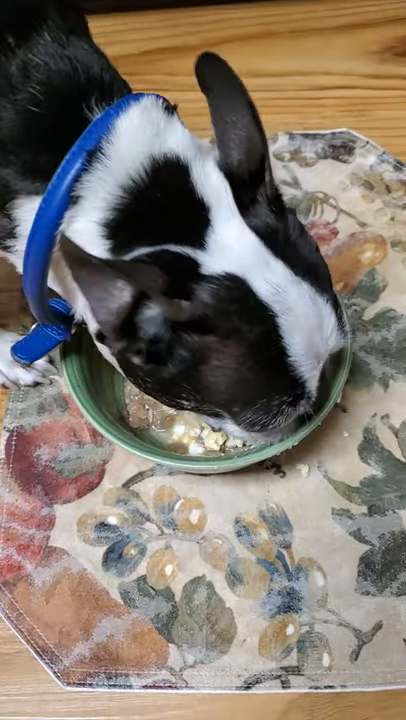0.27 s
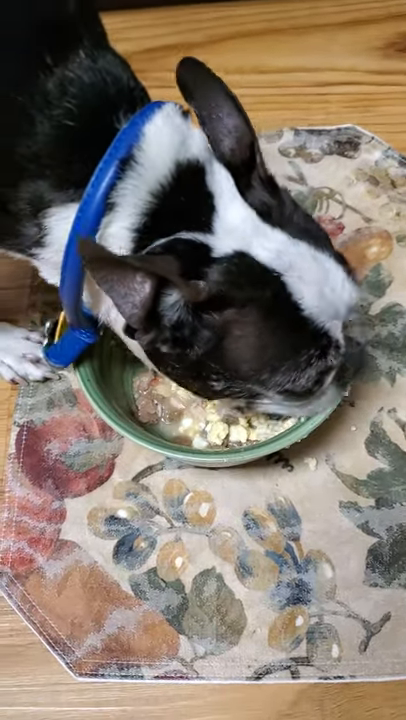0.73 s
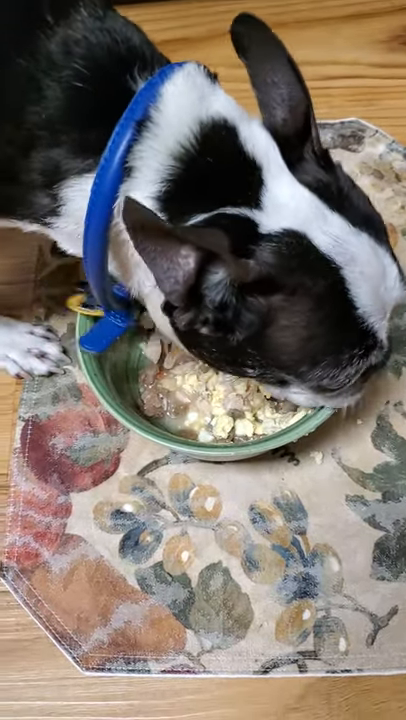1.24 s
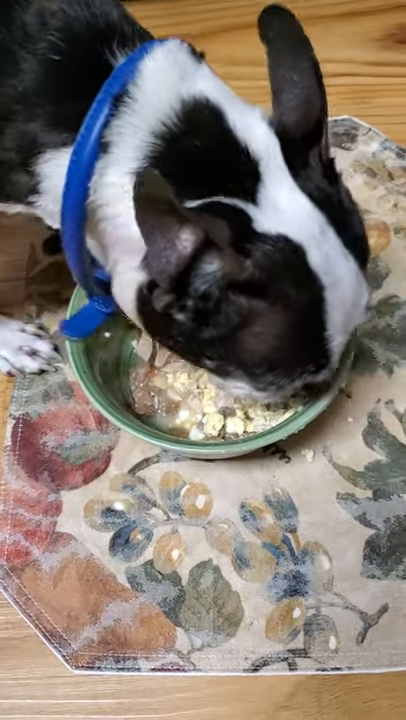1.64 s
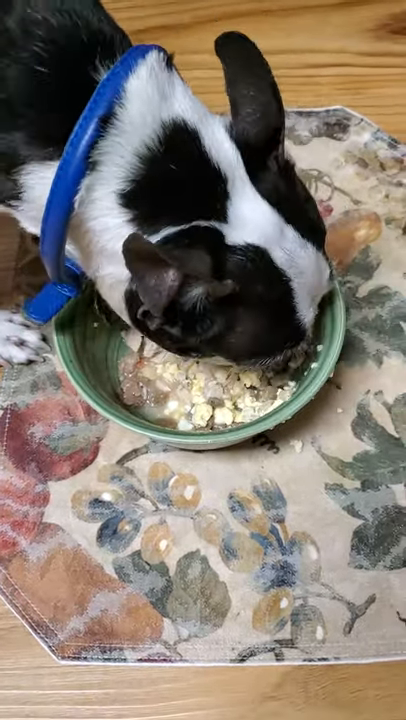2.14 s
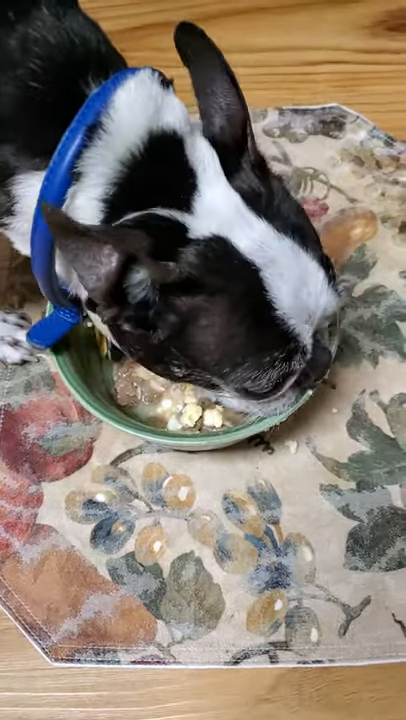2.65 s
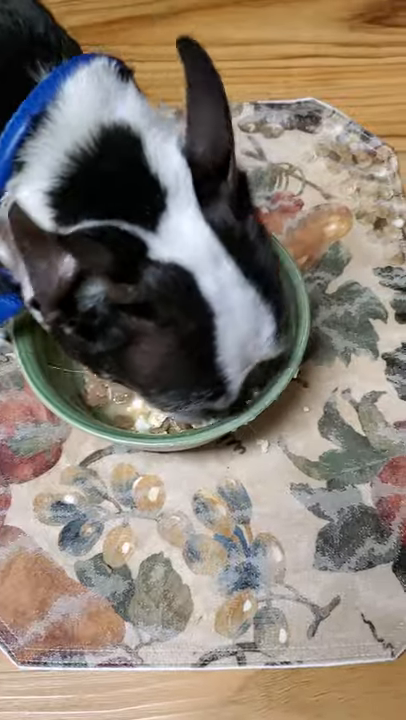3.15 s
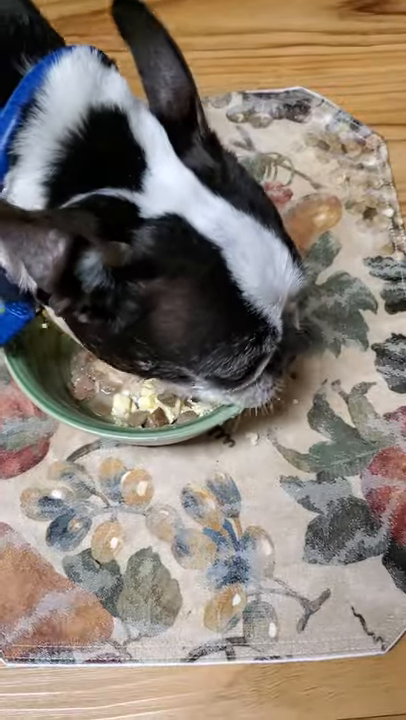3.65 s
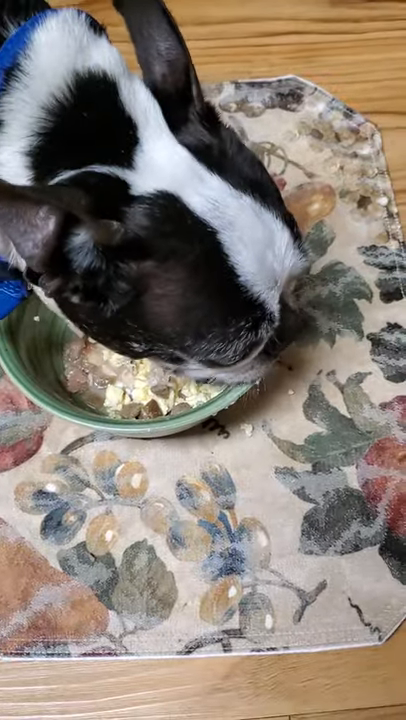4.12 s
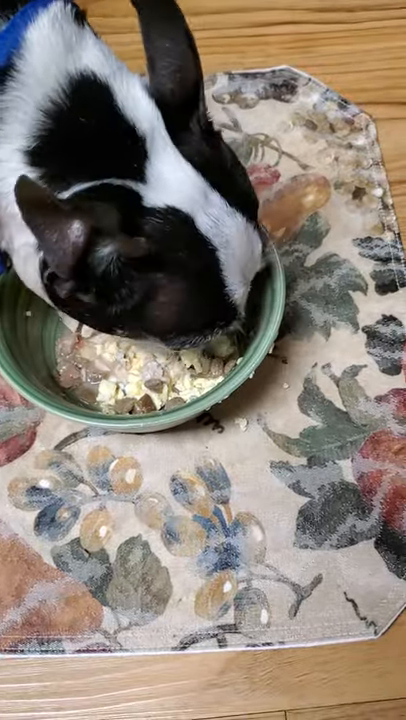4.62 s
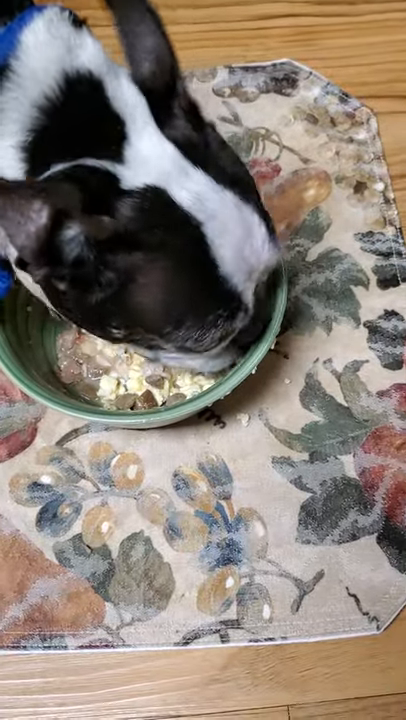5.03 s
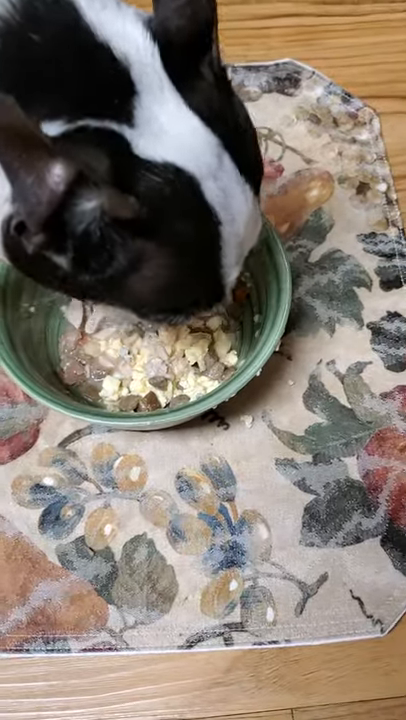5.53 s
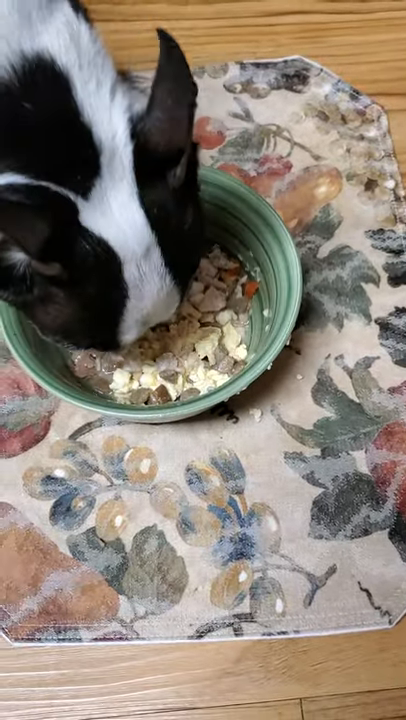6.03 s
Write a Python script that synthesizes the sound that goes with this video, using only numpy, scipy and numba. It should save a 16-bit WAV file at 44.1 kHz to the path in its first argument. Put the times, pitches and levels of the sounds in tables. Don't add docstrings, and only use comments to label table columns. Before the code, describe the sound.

A flat-nosed dog gobbles soft food close up, smacking wetly and snorting, while its metal tag clinks against a ringing ceramic bowl.

```python
import sys
import numpy as np
from scipy import signal
from scipy.fft import rfft, irfft, next_fast_len
from scipy.io import wavfile
from scipy.ndimage import uniform_filter1d
from numba import njit

SR = 44100
rng = np.random.default_rng(int(sys.argv[2]) if len(sys.argv) > 2 else 0)


def decibels_to_gain(level_db):
    exponent = np.asarray(level_db, float) / 20
    return 10 ** exponent


def pcm_store(signal):
    levels = np.round(np.clip(np.atleast_2d(signal), -1, 1) * 32767)
    wavfile.write(sys.argv[1], SR, levels.astype(np.int16).T)


N = 276940

# (time [s], tick peak [dB], ring [dB], tilt toward high modes [dB per group],
# spot on the rim: raises every other group, lowers the rest [dB])
BOWL_TAPS = [(0.399, -58, -71, -3.5, 6.5), (0.4917, -22.5, -57, 0, 3.5), (0.7165, -33, -60.5, 0, 1.5),
             (0.858, -43, -73.5, -3.5, -1), (1.766, -16, -31.5, -0.5, 5), (1.9753, -30, -44.5, -2.5, 4),
             (2.0655, -17, -47.5, -4, 4), (2.1447, -50.5, -66, -4, 11), (2.19, -21, -53.5, -2.5, 0.5),
             (2.2987, -22.5, -60.5, 1, 7.5), (2.375, -24.5, -62, -1, 3), (2.863, -51.5, -70, 3.5, 5),
             (3.2135, -18, -41.5, 3, 0), (3.2999, -20.5, -58, 2.5, 11.5), (4.5181, -18, -31.5, 0.9, 2),
             (4.8464, -30, -52.5, -1, 1.5), (4.9317, -28, -66.5, -6, 4.5), (5.1502, -35, -61, -1.3, 2),
             (5.252, -26, -57.5, 0.5, 1), (5.3229, -45, -56.5, 3, 0.5), (5.8782, -14, -37.5, -0.1, 4),
             (5.9828, -19, -56, 3, -4.5), (6.2354, -27, -59.5, 2.5, 3)]
# (frequency [Hz], ..)
BOWL_HZ = [
    [2390, 2379, 991],
    [4253, 4241, 4279],
    [6541, 6529],
    [9168, 9146, 12050, 12010, 13880, 15160],
]
# (level [dB], decay t60 [s], left over right [dB])
BOWL_MODES = [
    [(3, 0.33, -14), (-10, 0.28, -2), (-14.5, 0.33, -10.5)],
    [(-0.5, 0.072, -7), (-13.5, .33, -13.5), (-13, 0.24, -7)],
    [(3, 0.34, -6.5), (-18, 0.12, 10)],
    [(-6, 0.2, 8), (-7.5, 0.21, 8.5), (-5.5, 0.37, 4.5), (-7.5, 0.15, 6.5), (-12.5, .22, 9),
     (-1.5, 0.19, 9)],
]
# (time [s], change [dB])
RIM_TOUCHES = [(0.43, -5), (0.56, -1), (1.94, -15), (2.19, -9), (2.27, -7), (2.33, -3), (3.3, -8.5),
               (5.2, 3), (5.36, -7), (5.9, -0.5), (6.03, -13)]
# (time [s], tick peak [dB], ring [dB], top group over the ring [dB])
TAG_FACE_TAPS = [(1.2323, -17, -65.5, 9), (1.3812, -14.5, -71, 22), (1.9776, -4.5, -37, 9),
                 (2.0644, -26, -45.5, 14), (2.372, -41, -56, 14.5), (2.612, -34, -73, 14),
                 (3.2136, -8, -41.5, -22), (4.5192, -37, -39.5, -24), (4.8474, -31, -48.5, 7.5),
                 (5.1502, -18.5, -55, 13), (5.8785, -22, -53, -1), (6.1622, -27, -59, -7)]
# (time [s], tick peak [dB], ring [dB], top group over the ring [dB])
TAG_EDGE_TAPS = [(0.0343, -30, -68, 1), (0.0744, -14, -56, 7.5), (0.4691, -18.5, -54, -3),
                 (0.656, -28, -59, 0), (0.7063, -32, -58, 10), (0.7198, -22, -57, 8),
                 (0.858, -34, -68.5, 10), (0.4615, -30, -70, 6), (1.498, -36, -68, 5),
                 (1.255, -30, -64.5, 2), (2.1914, -30, -54.5, 15.5), (2.4234, -15.5, -61, 11),
                 (4.3136, -30, -77, -9), (5.1327, -44, -74, 2), (1.1483, -37, -68, 8),
                 (1.289, -26, -33, -1.5), (1.452, -24, -56, 0), (1.6466, -35, -64.5, 5),
                 (1.7649, -14.5, -42.5, -5.5), (2.1447, -25, -54.5, 22), (2.8255, -19, -55, 9.5),
                 (3.6533, -29, -61, 6.5), (4.964, -38, -57.5, 9), (5.251, -40, -50.5, 12),
                 (5.3228, -17, -55, 18)]
# (frequency [Hz], ..)
TAG_HZ = [
    [8376, 8350],
    [10220, 10300, 10095],
    [11670, 11610, 14970],
]
# (level [dB], decay t60 [s], left over right [dB])
TAG_MODES = [
    [(-4, 0.17, 12), (-11, 0.19, 5.3)],
    [(3.5, 0.15, 7.8), (1.5, 0.081, 6.6), (-9.5, 0.085, 5.5)],
    [(1.5, 0.083, 5), (-11.5, 0.26, 5), (-11.5, 0.15, 4)],
]
# (time [s], peak [dB], cavity [Hz],
# bright part [dB], dull part [dB])
SMACKS = [(0.067, -43, 2680, -20, -21), (0.0808, -23, 2580, -66, -1), (0.4314, -41.5, 2650, -11.5, -14),
          (0.89, -58.5, 2600, 2, -13), (1.0549, -42, 2680, -14, 0.5), (1.1837, -49, 2700, -18, -10),
          (1.198, -28, 2635, -21, -7), (1.379, -33.5, 2710, -18, 3), (1.5173, -35, 2580, -10, -36),
          (1.5247, -26, 2320, -9.5, -36), (1.534, -24, 2600, -34, -53), (2.2876, -34, 2720, -58, -18),
          (2.3247, -27, 2560, -50, -27), (2.3376, -34, 2530, -23, -22), (2.6414, -47.5, 2380, -20, -8),
          (2.653, -38.5, 2540, -18, -6), (2.751, -48, 2620, -19, -5), (2.9617, -45, 2640, -28, -2),
          (3.0807, -48, 2690, -34, -21), (3.652, -40, 2670, -31, -25), (3.931, -51, 2700, -19, -10),
          (3.946, -45, 2680, -34, 5), (3.961, -50, 2844, -21, -8), (4.1098, -30, 2790, -16, -19),
          (4.1234, -49, 2760, -30, -10), (4.244, -41.5, 2680, -14.5, 1), (4.2728, -40, 2680, -25, -2),
          (4.4412, -45, 2680, -8, 1), (4.78, -46, 3000, -12, -15), (5.053, -48, 2700, -12, -15),
          (4.887, -36, 2540, -18, -23), (5.67, -37.5, 3300, -38, -4), (0.553, -45, 2370, -30, -20.5),
          (3.812, -45, 2790, -23, 3),
          (0.112, -52.5, 1920, -32, 22), (0.206, -36, 1870, -26, 4.5),
                 (0.6064, -46.5, 1920, -19, -8), (1.019, -47, 1890, -41, -21), (1.363, -52, 1910, -25, -10),
                 (1.944, -52, 1960, -4, 14), (2.194, -50, 1510, -30, 10), (2.2061, -38, 1710, -37.5, 14),
                 (2.806, -45.5, 1860, -13, -10), (2.818, -41, 1940, -22, -8), (3.139, -49, 1910, -9.5, -3),
                 (3.2084, -47, 1950, -25, 12.5), (3.8058, -48, 1815, -6, 9), (4.0273, -43, 1966, -16, -15),
                 (4.0676, -38.5, 2210, -18, -10), (4.1681, -30.5, 1853, -39, 3.5),
                 (4.597, -39, 1600, -28, 3), (5.3652, -45, 1830, -20, -5), (5.5393, -38.5, 2020, -6.5, 6.5),
                 (6.0464, -44, 1900, -20, -7), (6.1315, -41, 1930, -18, 0), (6.2744, -43, 1885, -42, -24),
                 (0.36, -53, 1900, -35, -21)]
# (multiple of the cavity pitch, level [dB])
MOUTH_MODES = [(.58, -16.5), (1, 1), (1.45, -15.5), (1.75, -17.5), (2.45, -22.5)]
# (time [s], wet crackle [dB], spray over the crackle [dB])
CHEWS = [(0.11, -41.5, -22), (0.48, -56.5, -30), (0.66, -64, -24), (1.06, -53, -18.5), (1.17, -55.5, -14.5),
         (1.31, -58, -6.5), (1.41, -54, -30), (1.56, -70.5, 12.5), (1.981, -52, -18), (2.13, -63, -6),
         (2.29, -47, -34), (2.44, -56, -18), (2.86, -61, -13), (3.2, -60, -17), (3.36, -60.5, -19),
         (3.759, -59, -9), (3.89, -53.5, -30), (4.01, -62, -9), (4.134, -46.5, -15.5), (4.589, -44, -22),
         (4.721, -72, -7.5), (5.28, -50.5, -39), (5.39, -50, -26), (5.47, -52.5, -3), (5.55, -53.5, -8),
         (5.72, -65.5, 1), (5.82, -54.5, -3.5), (5.93, -58.5, -1.5), (6.02, -71, 7), (6.136, -46.5, -26)]
# (start [s], length [s], nostril flutter [Hz], flutter [dB], rasp [dB])
BURST_SNORTS = [
    (-0.018, 0.18, 158.8, -39.5, -39.5),
    (2.185, .115, 116.4, -37, -31),
    (2.389, .11, 148.5, -33.5, -37.5),
    (2.652, 0.072, 123.7, -37, -34.5),
    (2.802, .07, 122.7, -34, -35.5),
    (3.498, 0.093, 110.3, -40.5, -41),
    (4.581, .065, 123.4, -58, -39.5),
    (5.659, 0.23, 180.4, -32, -30.5),
]
# (start [s], length [s], nostril flutter [Hz], flutter [dB], rasp [dB])
SWELL_SNORTS = [(1.976, .12, 193.3, -45, -32.5), (3.413, .14, 161.5, -32, -33),
                (4.024, 0.095, 171.3, -33, -33), (4.161, 0.061, 151.6, -61, -39.5),
                (5.223, 0.14, 160, -34.5, -34.5), (5.346, 0.13, 166, -38.5, -26),
                (0.434, 0.089, 149.2, -43, -55), (3.747, .08, 119.7, -41, -58),
                (5.901, 0.096, 121.9, -37.5, -36), (5.967, 0.12, 121, -38, -31),
                (6.062, .16, 134.8, -37, -31.5)]
# (time [s], frequency [Hz])
NOSE = [(0, 656), (2.0, 710), (2.85, 760), (3.45, 474), (4.2, 519.3), (5.28, 684), (5.42, 533.4),
        (5.75, 649), (5.95, 890), (6.07, 593), (6.28, 750)]
# (time [s], peak [dB])
PALATE = [(2.198, -23), (5.234, -37), (5.671, -24), (5.71, -22), (5.734, -13), (5.75, -16), (5.984, -19),
          (6.014, -24), (6.046, -17), (6.085, -17.5), (6.121, -20), (6.137, -19.5)]
# (time [s], peak [dB])
PUFFS = [(5.6935, -46), (5.708, -48), (5.7279, -55), (5.7448, -38.5), (5.758, -49), (5.79, -44),
         (5.82, -45.5), (5.85, -48), (5.94, -35), (6.012, -37), (6.046, -44), (6.0676, -37), (6.084, -49),
         (6.115, -42), (6.134, -40), (4.045, -47), (4.07, -46.5), (5.46, -44), (5.479, -37.5)]
# (time [s], level [dB])
BREATHS = [(0.11, -73.5), (0.84, -80), (1.31, -76), (1.56, -75), (1.85, -73), (2.0, -70), (2.22, -77),
           (3.36, -72), (3.759, -77.5), (4.13, -79), (4.59, -76), (5.22, -84), (5.47, -63.5), (5.75, -76),
           (5.93, -73), (6.136, -67.5)]
# (frequency [Hz], level [dB per Hz])
HISS = [(4000, -35.5), (6800, -11), (15300, -6), (16300, -8), (16500, -52)]
# (frequency [Hz], likeness [0..1])
LIKENESS = [(60, 0.28), (250, 0.98), (700, 0.067), (2000, 0.44), (10000, 0.16)]
# (frequency [Hz], level [dB rms])
HUM = [(59.2, -45), (80.7, -42.5), (118.4, -57)]
# (frequency [Hz], level [dB per Hz])
ROOM_TONE = [(29, -31), (50, 7), (87, 2), (126, 10), (989, -14), (1140, -52.5), (2370, -19.5),
             (3850, -72.5), (15000, -77.5), (16500, -59)]
# (time [s], level [dB])
BACKGROUND = [
    (0.0, -47),
    (2.87, -51.5),
    (4.76, -48),
    (4.95, -49.5),
    (6.28, -46.5),
]

RIGHT_LAG = 8
RATTLE_LOW_HZ = 7800
FACE_LOW_DB, EDGE_LOW_DB = 4, -11
CHEW_RISE_DB_PER_S, CHEW_FALL_DB_PER_S = 181.5, 154
BURST_ATTACK_S, BURST_FROM_DB, BURST_FADE_DB = .016, -43, -21.5
SWELL_ATTACK_SHARE, SWELL_FROM_DB, SWELL_FADE_DB = .45, -17.5, -16
FLUTTER_SAG_PER_S = .4
MOUTH_PAN_DB, MOUTH_ROOM_DB = -9.5, -24
ROOM_T60_S = 0.42


def unit(x):
    return x / np.sqrt(np.mean(x ** 2) + 1e-20)


def in_time(rows):
    s, *columns = np.transpose(rows)
    return [np.interp(np.arange(N) / SR, s, c) for c in columns]


def band(x, low_hz, high_hz, order=2):
    edges = [low_hz, min(high_hz, .45 * SR)]
    return signal.sosfilt(signal.butter(order, edges, "band", fs=SR, output="sos"), x)


def drift(rate):
    r = np.exp(-80 * np.pi * rate / SR)
    slow = signal.lfilter([1], [1, -2 * r, r * r], rng.standard_normal(N // 40 + 2002))[2000:]
    return np.interp(np.arange(N) / 40, np.arange(len(slow)), unit(slow))


def ring(clicks, hz, t60):
    r, w = decibels_to_gain(-60 / (t60 * SR)), 2 * np.pi * hz / SR
    return signal.lfilter([0, np.sin(w)], [1, -2 * r * np.cos(w), r * r], clicks + 1e-18)


def clicks_at(times, db):
    x = np.zeros(N)
    x[(np.asarray(times) * SR).astype(int)] = decibels_to_gain(db)
    return x


def burst(clicks, t60):
    return signal.lfilter([1], [1, -decibels_to_gain(-60 / (t60 * SR))], clicks) * rng.standard_normal(N)


def place(x, pan_db):
    return np.array([x * decibels_to_gain(pan_db / 2), np.roll(x, RIGHT_LAG) * decibels_to_gain(-pan_db / 2)])


def swells(times, db, rise_db_per_s, fall_db_per_s, rest_db):
    t = np.arange(0, N + 64, 64) / SR
    late = t - np.array(times)[:, None]
    each = np.array(db)[:, None] + np.minimum(rise_db_per_s * late, -fall_db_per_s * late)
    return np.interp(np.arange(N) / SR, t, np.maximum(each.max(axis=0), rest_db))


def on_log(points, hz):
    point_hz, value = np.transpose(points)
    return np.interp(np.log(hz), np.log(point_hz), value)


def coloured(spectrum, patchy_db):
    out = 0
    edges = 45 * 2 ** np.arange(0, 8.6, .5)
    white = rng.standard_normal((2, 2, N))
    for k, (low, high) in enumerate(zip(edges, edges[1:])):
        hz = np.sqrt(low * high)
        if hz > spectrum[0][0]:
            mid, side = band(white[k % 2], low, high)
            alike = np.clip(on_log(LIKENESS, hz), 0, 1)
            gain = decibels_to_gain(on_log(spectrum, hz) + patchy_db * drift(33.4))
            out = out + gain * (np.sqrt(1 + alike) * mid + np.sqrt(1 - alike) * side * [[1], [-1]])
    return unit(out)


@njit
def sliding_resonance(x, w, r):
    y = np.zeros(len(x))
    for i in range(2, len(x)):
        y[i] = (1 - r * r) / 2 * (x[i] - x[i - 2]) + 2 * r * np.cos(w[i]) * y[i - 1] - r * r * y[i - 2]
    return y


def struck(taps, modes_hz, modes, ring_db, tick_db, rattle_db, rattle_s, low_hz, left, wash_db):
    taps = np.array(taps)
    s = taps[:, 0]
    hits = clicks_at(s, taps[:, 1])
    out = place(band(burst(hits, 0.022), low_hz, 14000), 0.86) * decibels_to_gain(tick_db)
    rattle = np.array([burst(hits, rattle_s), burst(hits, rattle_s)])
    out += band(rattle, RATTLE_LOW_HZ, 15000) * decibels_to_gain(rattle_db)
    low_rattle = band(burst(hits, rattle_s), 0.24 * RATTLE_LOW_HZ, 0.42 * RATTLE_LOW_HZ)
    out += place(low_rattle, -9.5) * decibels_to_gain(rattle_db - 3.5)
    wash_hits = clicks_at(s, taps[:, -1] + wash_db) / left
    wash = np.array([burst(wash_hits, .17), burst(wash_hits, 0.15)])
    out += left * band(wash, 9900, 15400) * decibels_to_gain(np.array([[2.5], [-2.5]]))
    for k, (pitches, group) in enumerate(zip(modes_hz, modes)):
        for f, (db, t60, pan_db) in zip(pitches, group):
            push = clicks_at(s, taps[:, 2 + k] + db + ring_db) / left
            swell = ring(push, f, 0.003)
            warble = left * decibels_to_gain(min(f / 4000, 2.6) * drift(40 + f / 40))
            out += place(warble * ring(swell, f, t60) / 16, pan_db)
    return out


def bowl():
    steps = np.arange(len(BOWL_MODES)) - (len(BOWL_MODES) - 1) / 2
    around = np.array([-1, 1, -1, 1])
    taps = [(s, tick, *(db + tilt * steps + spot * around)) for s, tick, db, tilt, spot in BOWL_TAPS]
    touch_db = np.cumsum(sum(db * clicks_at([s], 0) for s, db in RIM_TOUCHES))
    left = decibels_to_gain(uniform_filter1d(touch_db, size=300))
    return struck(taps, BOWL_HZ, BOWL_MODES, ring_db=10.0, tick_db=-15.0, rattle_db=-14.0, rattle_s=0.045,
                  low_hz=925, left=left, wash_db=5.5)


def tag():
    taps = [(s, tick, db + FACE_LOW_DB, db, db + top) for s, tick, db, top in TAG_FACE_TAPS]
    taps += [(s, tick, db + EDGE_LOW_DB, db, db + top) for s, tick, db, top in TAG_EDGE_TAPS]
    return struck(taps, TAG_HZ, TAG_MODES, ring_db=9.5, tick_db=-30.0, rattle_db=-18.5, rattle_s=0.05,
                  low_hz=9100, left=1, wash_db=0.5)


def smacks():
    s, db, hz, bright_db, dull_db = np.transpose(SMACKS)
    tearing = decibels_to_gain(7 * drift(250))
    pops, click = np.zeros(N + 2048), np.eye(1, 2048)[0]
    for start, d, f in zip((s * SR).astype(int), db, hz):
        mouth = sum(decibels_to_gain(g) * ring(ring(click, k * f, 0.0029), k * f, 0.02) for k, g in MOUTH_MODES)
        pops[start:start + len(click)] += decibels_to_gain(d + 7.5) * mouth / 11
    pops = pops[:N]
    snap = band(burst(clicks_at(s, db - 5.0), 0.0036), 1200, 2700)
    broad = band(tearing * burst(clicks_at(s, db - 0.8), 0.17), 1810, 3150, order=3)
    spray = band(np.sqrt(tearing) * burst(clicks_at(s, db + bright_db + 5.0), 0.12), 3400, 8900)
    thud = burst(clicks_at(s, db + dull_db + 3), 0.12)
    dull = snap + band(thud, 450, 1170, order=3) + decibels_to_gain(-15.5) * band(tearing * thud, 1260, 3100)
    return pops + broad + spray, dull


def crackle(db, low_hz, high_hz, cycles, per_s):
    sizes = decibels_to_gain(4.3 * np.minimum(rng.exponential(1, N), 5)) * rng.choice([-1, 1], N)
    born = rng.random(N) < per_s * decibels_to_gain(4.0 * drift(25)) / SR
    pitches = np.geomspace(low_hz, high_hz, 10)
    dealt = rng.integers(0, 10, N)
    pops = sum(ring(sizes * born * (dealt == k), hz, cycles / hz) for k, hz in enumerate(pitches))
    return decibels_to_gain(db) * unit(pops)


def chewing():
    s, db, spray_over_db = np.transpose(CHEWS)
    crackle_db = swells(s, db, CHEW_RISE_DB_PER_S, CHEW_FALL_DB_PER_S, rest_db=-71)
    spray_db = swells(s, db + spray_over_db, CHEW_RISE_DB_PER_S, CHEW_FALL_DB_PER_S, rest_db=-84)
    squeeze = crackle(crackle_db + 2.5, 1628, 2700, cycles=18.5, per_s=1000)
    return squeeze + crackle(spray_db + 8.0, 3130, 5160, cycles=30, per_s=5400)


def airflow():
    t = np.arange(0, N + 32, 32) / SR
    shapes = [(BURST_ATTACK_S, BURST_FROM_DB, BURST_FADE_DB, *row) for row in BURST_SNORTS]
    shapes += [(SWELL_ATTACK_SHARE * row[1], SWELL_FROM_DB, SWELL_FADE_DB, *row) for row in SWELL_SNORTS]
    tracks = []
    for attack, from_db, fade_db, s, length, hz, flutter_db, rasp_db in shapes:
        corners_s = [-.012, 0, attack, length, length + .02]
        shape = np.interp(t - s, corners_s, [-60, from_db, 0, fade_db, -60])
        pitch = hz * (1 - FLUTTER_SAG_PER_S * np.clip(t - s - attack, -length, length))
        tracks.append([shape, pitch, flutter_db + shape, rasp_db + shape])
    tracks = np.array(tracks)
    strongest = tracks[:, :1].argmax(axis=0)[None]
    leader = np.take_along_axis(tracks, strongest, axis=0)[0]
    return [np.interp(np.arange(N) / SR, t, c) for c in leader[1:]]


def snorts():
    hz, flutter_db, rasp_db = airflow()
    nose_hz, = in_time(NOSE)
    phase = 2 * np.pi * np.cumsum(hz * (1 + 0.055 * drift(40))) / SR
    flutter = np.sqrt(2) * (np.sin(phase) + 0.073 * np.sin(2 * phase + 0.39)) * decibels_to_gain(4.7 * drift(35))
    slaps = np.diff(np.floor(phase / (2 * np.pi)), prepend=0) * decibels_to_gain(1.1 * rng.standard_normal(N))
    puffs = -unit(slaps) + 1.6 * rng.standard_normal(N) * decibels_to_gain(2.2 * drift(67))
    nose = sliding_resonance(puffs, 2 * np.pi * nose_hz / SR, np.exp(-np.pi * 160 / SR))
    rasp = unit(band(unit(nose) + 0.63 * unit(band(puffs, 320, 770)), 317, 1020, order=3))
    rasp += decibels_to_gain(-9) * unit(band(puffs, 1800, 2400)) + decibels_to_gain(-19.0) * unit(band(puffs, 850, 1560))
    rasp += decibels_to_gain(-19.5) * unit(band(puffs, 8200, 10000)) + decibels_to_gain(-17.5) * unit(band(puffs, 2834, 4200))
    return decibels_to_gain(flutter_db) * flutter + decibels_to_gain(rasp_db - 2.5) * rasp


def palate():
    slaps = -clicks_at(*np.transpose(PALATE))
    cavities = ring(slaps, 583, 0.0074) + ring(slaps, 145, 0.021) + decibels_to_gain(-22) * ring(slaps, 1960, 0.011)
    return band(cavities, 77, 6000)


def puffs_of_air():
    hiss = burst(clicks_at(*np.transpose(PUFFS)), 0.084) * decibels_to_gain(2 * drift(180))
    upper = decibels_to_gain(4) * band(hiss, 7150, 9750) + decibels_to_gain(-9) * band(hiss, 9000, 17000)
    return place(band(hiss, 4660, 4850), -8) * decibels_to_gain(6.5) + place(upper, 9)


def breath():
    hiss_db = swells(*np.transpose(BREATHS), rise_db_per_s=164, fall_db_per_s=136, rest_db=-88.5)
    return decibels_to_gain(hiss_db + 17.5 + 3.4 * drift(70)) * coloured(HISS, patchy_db=1.2)


def room(x):
    size = next_fast_len(N + SR)
    w = 2 * np.pi * np.arange(size // 2 + 1) / size
    loss = 1 / np.sqrt(1 + (w * SR / (2 * np.pi * 7000)) ** 2)
    lags = (rng.uniform(0.0044, 0.02, (2, 8)) * SR).astype(int)
    loops = [[decibels_to_gain(-60 * d / SR / ROOM_T60_S) * loss * np.exp(-1j * w * d) for d in side] for side in lags]
    tails = [sum((-1) ** k * g / (1 - g) for k, g in enumerate(side)) for side in loops]
    return irfft(rfft(x, size) * np.array(tails), size)[:, :N]


def background():
    t = np.arange(N) / SR
    hum = sum(decibels_to_gain(db + .8 * drift(2.5)) * np.sin(2 * np.pi * hz * t + .4 * drift(1.5)) for hz, db in HUM)
    tone = coloured(ROOM_TONE, patchy_db=.8)
    return decibels_to_gain(in_time(BACKGROUND)[0]) * (unit(hum) * decibels_to_gain(2.7) + decibels_to_gain(-1) * tone)


def scene():
    metal_and_bowl = bowl() + tag()
    crisp, dull = smacks()
    wet_food = crisp + chewing()
    nose = snorts() + palate()
    near = metal_and_bowl + place(wet_food, MOUTH_PAN_DB) + place(nose, -1.5) + place(dull, -2.5)
    near = near + puffs_of_air()
    to_room = decibels_to_gain(-6) * metal_and_bowl.mean(axis=0) + decibels_to_gain(MOUTH_ROOM_DB) * wet_food
    to_room = to_room + decibels_to_gain(-18.0) * band(nose, 460, 9000)
    return near + room(to_room) + breath() + background()


def low_pass(x):
    return signal.sosfilt(signal.butter(12, 16950, fs=SR, output="sos"), x)


def record(dry):
    no_bass = signal.sosfilt(signal.butter(4, 48, "high", fs=SR, output="sos"), dry)
    mix = signal.sosfilt(signal.cheby2(10, 35, 16600, fs=SR, output="sos"), no_bass)
    return low_pass(mix)


dry = scene()
out = record(dry)
pcm_store(out)
```